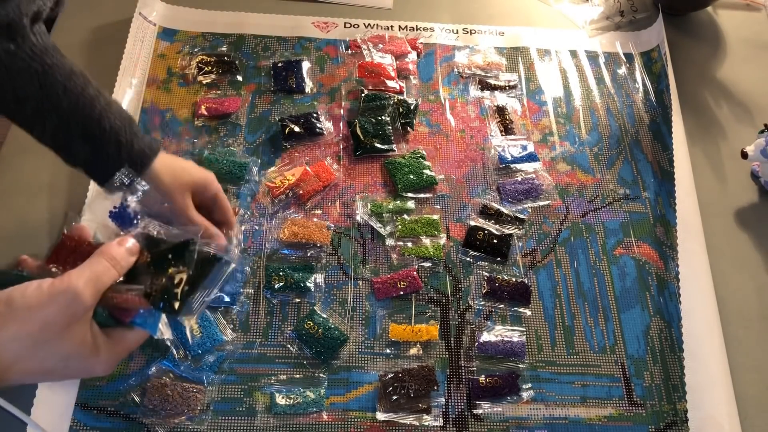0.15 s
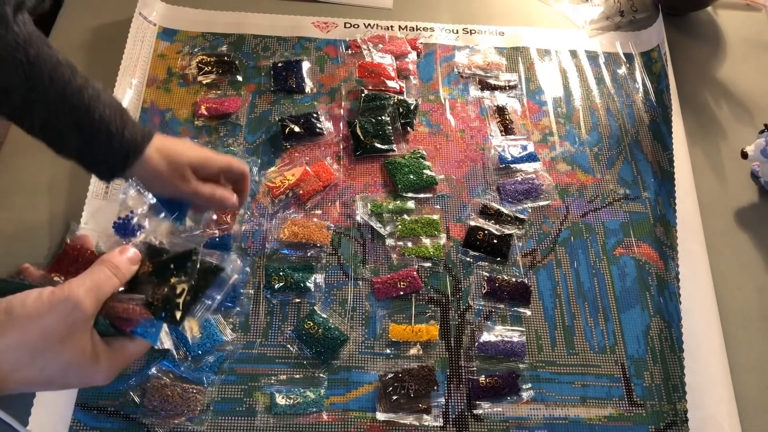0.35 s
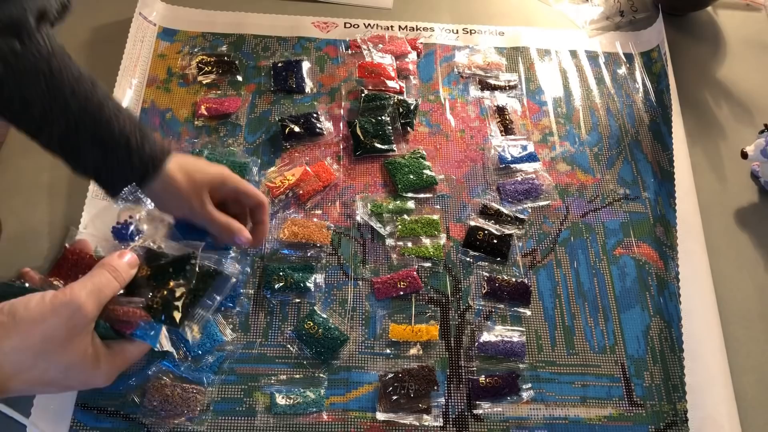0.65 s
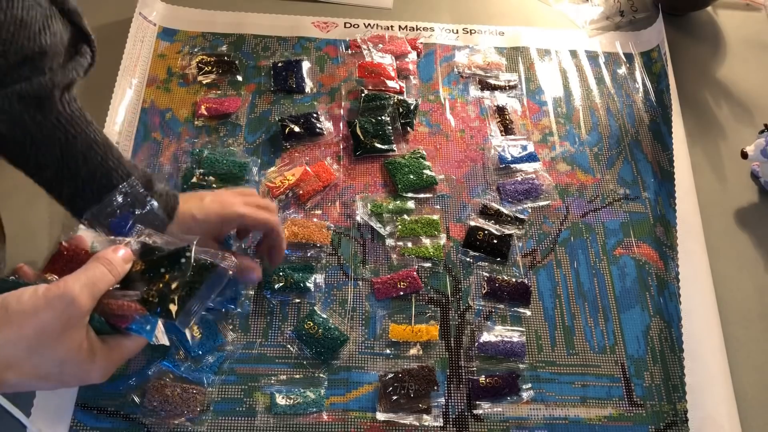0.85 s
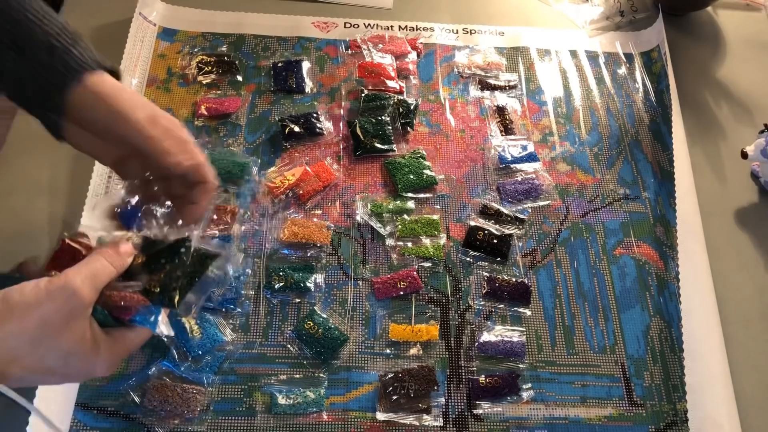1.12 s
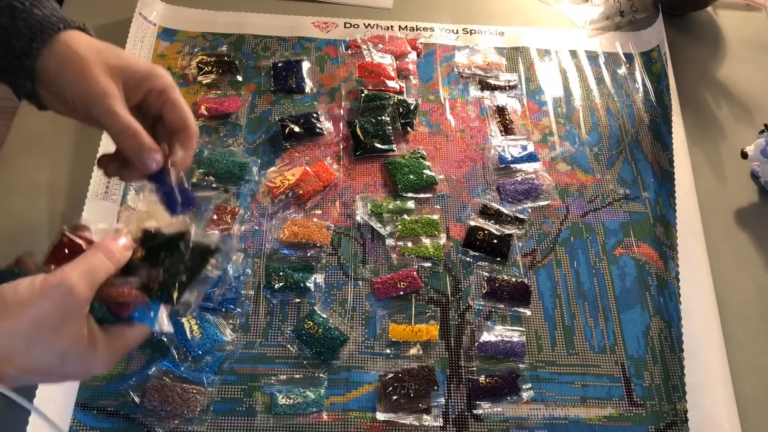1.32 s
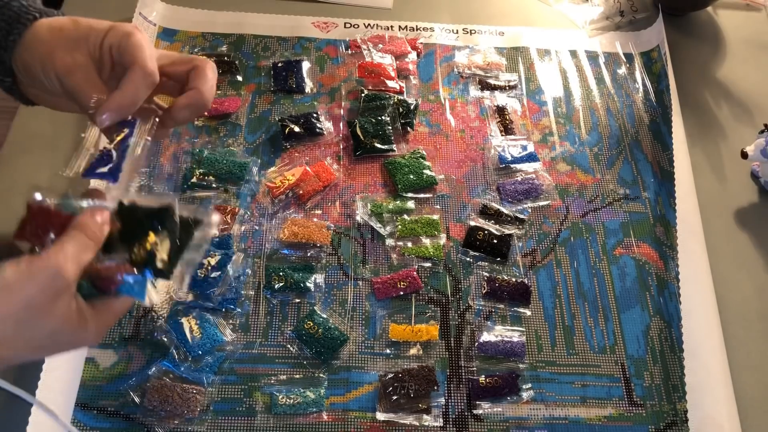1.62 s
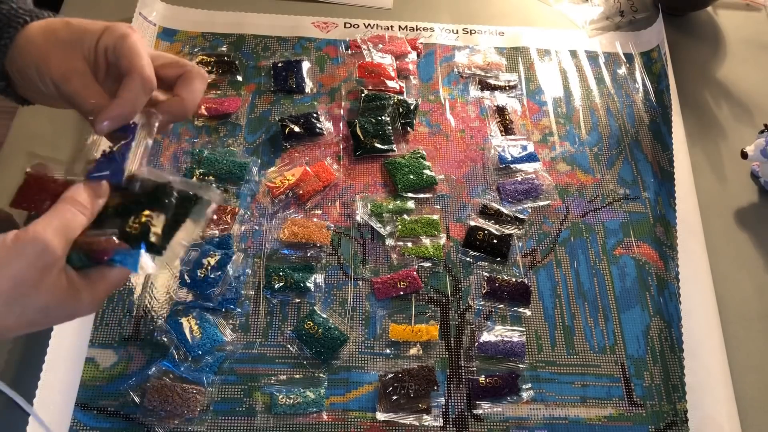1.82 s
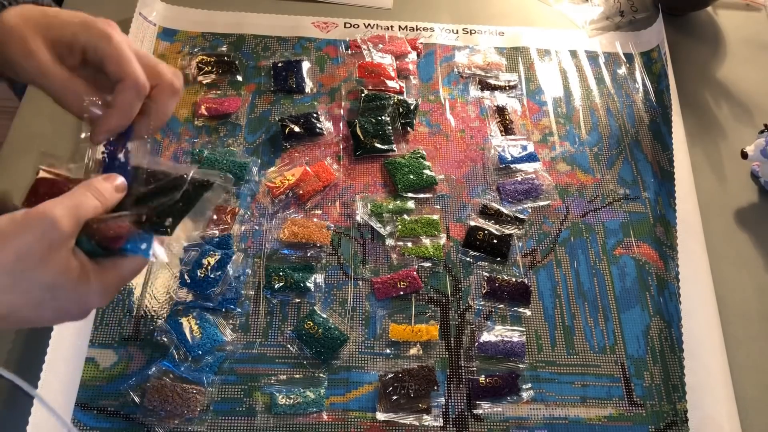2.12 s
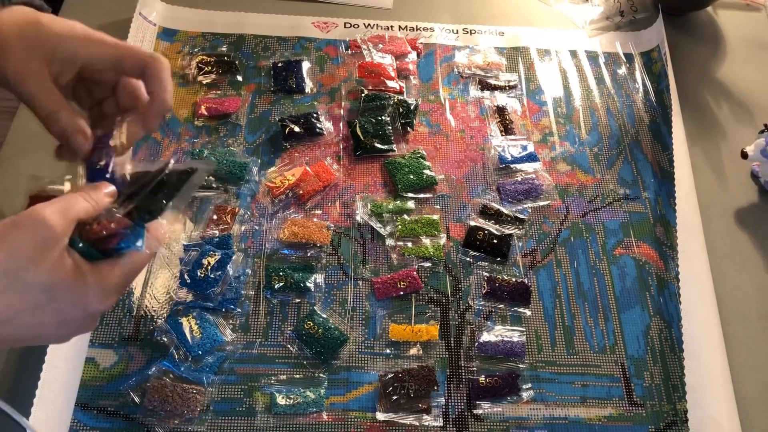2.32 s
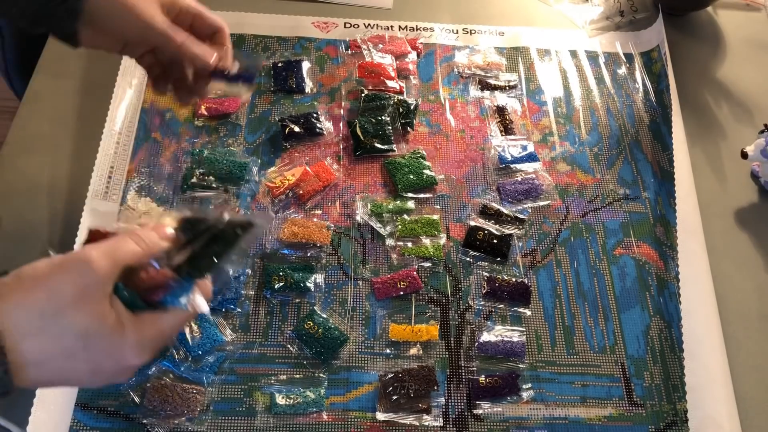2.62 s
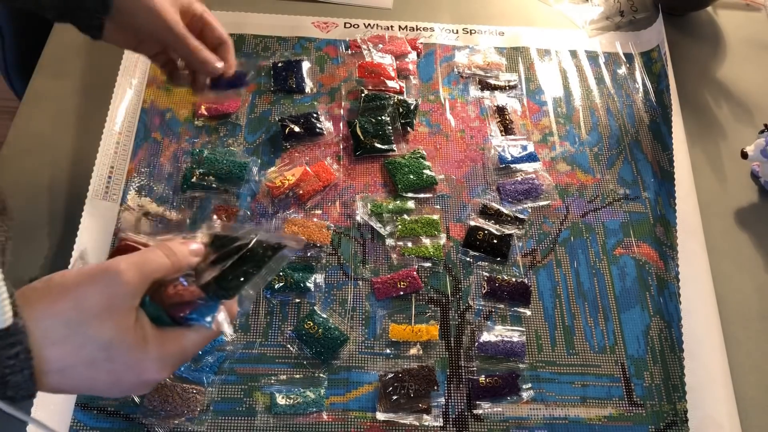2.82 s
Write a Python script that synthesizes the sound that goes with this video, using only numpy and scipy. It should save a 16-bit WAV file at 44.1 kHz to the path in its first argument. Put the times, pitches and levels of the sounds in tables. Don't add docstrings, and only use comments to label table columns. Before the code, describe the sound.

Small plastic bags crinkle and snap in quick clusters as hands sort them on a table

```python
import sys
import numpy as np
from scipy import signal
from scipy.fft import rfft, irfft
from scipy.io import wavfile
from scipy.ndimage import uniform_filter1d

SR = 44100
rng = np.random.default_rng(int(sys.argv[2]) if len(sys.argv) > 2 else 0)


def elevation(decibels):
    levels = np.asarray(decibels, float)
    return 10 ** (levels / 20)


def dump_mix(stems):
    frames = np.atleast_2d(stems).T
    limited = np.clip(frames, -1, 1)
    pcm = np.round(limited * 32767).astype(np.int16)
    wavfile.write(sys.argv[1], SR, pcm)


N = 130095


def evened(x):
    return x / np.sqrt(np.mean(x ** 2) + 1e-20)


def add(mix, s, sound):
    part = mix[round(s * SR):][:len(sound)]
    part += sound[:len(part)]


def colour(x, points):
    f, db = np.transpose(points)
    hz = abs(np.fft.fftfreq(16384, 1 / SR))
    curve_db = np.interp(np.log(hz + 1), np.log(f + 1), db)
    log_gain = np.log(elevation(np.maximum(curve_db, -100)))
    taps = np.fft.ifft(np.exp(np.conj(signal.hilbert(log_gain)))).real[:8192]
    return signal.oaconvolve(x, taps)[:len(x)]


def crease(x, hz, q):
    r = np.exp(-np.pi * hz / q / SR)
    poles = [1, -2 * r * np.cos(2 * np.pi * hz / SR), r * r]
    return (1 - r * r) / 2 * signal.lfilter([1, 0, -1], poles, x)


def hush():
    # f/Hz, level/dB
    hush_curve = [(53, -15), (90, -18.5), (292, -12.5), (640, -19), (1010, -16.5), (1210, -25.5),
                  (8390, -32.5), (16500, -33)]
    # t/s, level/dB
    drift = [(0, 6), (.3, 0.9), (2.55, 2), (2.7, -4.5)]
    level_db = -71.5 + np.interp(np.arange(N) / SR, *np.transpose(drift))
    noise = rng.standard_normal(N + 9000)
    return elevation(level_db) * evened(colour(noise, [(40, -36)] + hush_curve)[9000:])


def handling():
    # f/Hz, level/dB
    shake_curve = [(1.2, -32), (2.0, 14.5), (19, -3), (30, -19.5), (38, -12.5), (160, -36.5), (210, -79),
                   (350, -120)]
    f, db = np.transpose(shake_curve + [(400, -98)])
    hz = np.fft.rfftfreq(N, 1 / SR)
    gain = elevation(np.interp(np.log(hz + 1), np.log(f + 1), db))
    shake = evened(irfft(rfft(rng.standard_normal(N)) * gain, N))
    t = np.arange(N) / SR
    return elevation(-49) * shake * np.sin(np.pi * t / t[-1]) ** .2


def room(x):
    t60_s = 0.24
    taps = np.zeros(20000)
    at = np.arange(120, 19960, 20)
    taps[at + rng.integers(0, 20, len(at))] = rng.choice([-1., 1.], len(at))
    taps = taps * elevation(-60 * np.arange(20000) / SR / t60_s)
    taps = colour(taps, [(300, 4.0), (6000, 4.5), (16000, -9.5)])
    return signal.oaconvolve(x, taps / np.linalg.norm(taps))[:N]


def stand_bumps():
    # t/s, peak level/dB, f/Hz
    bump_rows = [
        (0.885, -46, 51),
        (2.076, -42, 30.4),
        (2.186, -36, 26),
        (2.214, -43.5, 60),
        (2.246, -39, 127),
        (2.29, -45, 47.3),
        (2.324, -43, 41.6),
    ]
    out, t = np.zeros(N), np.arange(8000) / SR
    for s, db, hz in bump_rows:
        u = t * hz / 1.18
        swell = 3 * u * np.exp(-u * u * 2)
        add(out, s - .008, elevation(db) * swell * np.sin(2 * np.pi * hz * t))
    return out


def table_knocks():
    # t/s, peak level/dB, f/Hz
    knocks = [(0.349, -51.5, 735), (0.364, -48, 770), (0.384, -43, 700), (0.512, -44.5, 955),
              (1.319, -51, 536), (1.385, -39, 380), (1.399, -42, 960), (1.407, -42.5, 513),
              (1.416, -44.5, 372), (1.531, -54.5, 382), (1.605, -45, 360), (1.852, -40, 858),
              (2.246, -38.5, 822), (2.366, -43.5, 364), (2.389, -47.5, 400), (2.4525, -42, 605),
              (2.513, -33, 1154), (2.514, -36, 364),
              (0.355, -46.5, 754), (0.371, -43.5, 756), (0.408, -51.5, 627), (0.887, -51, 767),
            (1.535, -57, 363), (1.589, -52, 358), (1.866, -43.5, 886), (1.897, -47, 1060),
            (1.956, -52.5, 760), (2.067, -51, 780), (2.091, -52, 514), (2.115, -61.5, 344),
            (2.157, -54, 385), (2.196, -48.5, 344), (2.475, -41.5, 517), (2.525, -35.5, 950)]
    ring_cycles, thud_share, attack_s = 16, .35, 0.00042
    out, t = np.zeros(N), np.arange(8000) / SR
    for s, db, hz in knocks:
        noise = rng.standard_normal(len(t))
        thud = evened(crease(crease(noise, 0.82 * hz, 1.65), 0.82 * hz, 1.65))
        pair = np.sin(2 * np.pi * hz * t) + thud_share * thud
        fall = elevation(db - 60 * t * hz / ring_cycles)
        add(out, s, fall * (1 - np.exp(-t / attack_s)) * pair)
    return out


def crackle():
    # f/Hz, level/dB
    rustle = [(180, -42.5), (300, -5.5), (756, -9.5), (1640, -6.5), (2400, -3.5), (2980, -5), (8140, -1),
              (15500, -3.5)]
    grains_per_s, grain_cycles, spread_db, hiss_db, patchy_db = 6000, 5.0, 3.4, -3, 2.8
    size = elevation(spread_db * np.minimum(rng.exponential(1, N), 3.8))
    size *= rng.random(N) < grains_per_s / SR
    size *= rng.choice([-1., 1.], N)
    kind, out = rng.integers(0, 24, N), np.zeros(N)
    for k, hz in enumerate(np.linspace(600, 16000, num=24)):
        u = np.arange(200) * hz / SR
        grain = np.sin(2 * np.pi * u + 1.1) * np.exp(-3 * u / grain_cycles)
        out += signal.oaconvolve(size * (kind == k), grain / np.linalg.norm(grain))[:N]
    film = evened(out) + elevation(hiss_db) * rng.standard_normal(N)
    z = signal.stft(film, nperseg=256)[2]
    patches = uniform_filter1d(rng.standard_normal(z.T.shape), size=8, axis=0)
    patches = evened(uniform_filter1d(patches, size=9, axis=1))
    film = signal.istft(z * elevation(patchy_db * patches.T), nperseg=256)[1][:N]
    return evened(colour(film, rustle))


def snap(db, hz, ring_db):
    snap_s, rebound_db, tick_db = .0005, -12, 8.5
    chance = rng.standard_normal(600)
    t = np.arange(len(chance)) / SR
    later = t - .001 - 0.0011 * abs(np.tanh(chance[0]))
    rebound = elevation(rebound_db) * (later > 0) * np.exp(-abs(later) / snap_s)
    push = chance * (np.exp(-t / snap_s) + rebound)
    push[8] += elevation(tick_db)
    x = evened(push) + elevation(ring_db) * evened(crease(push, hz, 4.5))
    x = signal.lfilter(*signal.butter(2, min(0.204 * hz, 9000), 'high', fs=SR), x)
    return elevation(db) * x / abs(x).max()


def bags():
    # t/s, peak level/dB, crease f/Hz, shower level re peak/dB
    snaps = [(0.0906, -40, 4600, -19), (0.2349, -36.5, 8700, -9), (0.3404, -48, 9910.0, -8.9),
             (0.3845, -33.5, 6130, -14), (0.4181, -40, 5130, -8), (0.4835, -35.5, 6870, -10.5),
             (0.5116, -39.5, 9360, -7), (0.5146, -41, 9520.0, -11.6), (0.756, -44, 8600, -16),
             (0.8306, -29.5, 9800, -27), (0.8823, -44, 2080, -11.3), (0.8902, -39.5, 2250, -9.6),
             (0.9228, -38.5, 2200, -9), (1.0168, -49, 5040, -10), (1.243, -44, 5200, -10),
             (1.249, -31, 5300, -11), (1.2725, -27, 5600.0, -13), (1.2947, -39, 5600, -12),
             (1.3091, -32, 7100, -9.5),
             (1.3608, -40, 3620.0, -16), (1.3872, -33, 9400, -9), (1.4011, -18, 9800, -13.5),
               (1.418, -32, 9130.0, -15), (1.4403, -31.5, 6550.0, -24), (1.4494, -34.5, 2320, -21),
               (1.4753, -39.5, 4870.0, -19), (1.5334, -28.5, 11000, -7.4), (1.59, -32.5, 7750, -11),
               (1.6057, -18, 9700, -22.5), (1.6418, -41, 5430, -17), (1.7155, -44, 9900, -14.6),
               (1.7915, -48, 2200, -15), (1.8204, -42, 7800, -14), (1.833, -41.5, 9700, -11.5),
               (1.8523, -29, 10030.0, -16), (1.8663, -32.5, 8130, -11.5), (1.8992, -22, 8100, -17.5),
               (1.9014, -23, 3600, -25), (1.9288, -31.5, 10680.0, -14.5), (1.9467, -31, 9950.0, -17),
               (1.9524, -31, 7940, -14), (1.9594, -24, 5040, -13), (1.9985, -34.5, 3600, -15),
             (2.069, -36, 7250, -6.5), (2.1075, -36.5, 5040.0, -16), (2.1175, -35.5, 2150, -11),
               (2.126, -34, 3750.0, -25), (2.1514, -33, 7920.0, -7.1), (2.162, -35, 2640, -6),
               (2.1953, -27, 5130, -16.5), (2.1987, -37, 7250, -26), (2.2132, -27, 7540, -15.5),
               (2.2458, -27, 9900, -14), (2.2491, -12, 9600, -21), (2.3325, -32.5, 2200, -13),
               (2.3794, -33, 9350.0, -15), (2.3906, -24.5, 5700, -17), (2.4533, -18.5, 4760, -18),
               (2.4584, -20, 10380.0, -17), (2.5138, -24, 2370.0, -12), (2.7007, -29, 3300, -22),
               (2.743, -32, 8250, -15.5), (2.759, -31, 9200, -12), (2.787, -35, 9260, -26),
               (2.7998, -35, 8900, -36), (2.8156, -25, 9100, -25), (2.8407, -35, 9600, -25),
               (2.8961, -30, 11900, -41)]
    # t/s, peak level/dB, crease f/Hz
    ticks = [(0.2842, -41, 7000), (0.3495, -44, 2100), (0.3776, -36, 8800), (0.4303, -44, 4000),
             (0.4623, -45, 7400), (0.4868, -40, 6900), (0.56, -50, 8600), (0.6548, -49, 6900),
             (0.6579, -49, 7000), (0.8072, -40, 1900), (0.8332, -37, 10300), (1.2466, -40, 5300),
             (1.2517, -37, 5200), (1.2689, -37, 5300), (1.3123, -38, 8000), (1.3235, -36, 7700),
             (1.3744, -41, 3800), (1.4035, -23, 11200), (1.5102, -40, 6800), (1.5188, -39, 8200),
             (1.5224, -42, 10500), (1.6095, -28, 7800), (1.6902, -47, 9000), (1.7936, -47, 2200),
             (1.8235, -50, 2200), (1.8556, -38, 8400), (1.8696, -38, 10100), (2.0221, -44, 2100),
             (2.039, -43, 7600), (2.0767, -41, 11800), (2.0841, -38, 3700), (2.0915, -37, 10200),
             (2.1288, -41, 7800), (2.1399, -43, 8700), (2.1562, -32, 4500), (2.1677, -34, 3700),
             (2.2167, -40, 9100), (2.2905, -39, 8800), (2.3019, -43, 2200), (2.3282, -42, 6600),
             (2.336, -36, 3100), (2.4391, -43, 9200), (2.4459, -38, 9100), (2.4658, -30, 4700),
             (2.5657, -38, 5600), (2.6061, -38, 10200), (2.6125, -40, 11600), (2.6212, -45, 5600),
             (2.6536, -48, 7200), (2.6827, -52, 9600), (2.7096, -44, 9600), (2.7469, -40, 5400),
             (2.7629, -36, 8700), (2.8061, -40, 3500), (2.819, -38, 8800), (2.8648, -39, 5500),
             (2.8723, -45, 5500), (2.8856, -44, 9000), (2.9021, -42, 10600), (2.9431, -48, 10100)]
    # middle t/s, half length/s, level/dB
    squeezes = [(.01, 0.02, -67), (0.277, 0.038, -58), (0.376, 0.02, -51), (0.453, 0.041, -59),
                (0.536, 0.022, -61), (0.617, 0.033, -63.5), (0.708, 0.017, -63), (0.825, 0.022, -53.5),
                (0.922, 0.051, -61.5), (1.398, 0.097, -58.5), (1.545, 0.012, -48), (1.605, 0.047, -59),
                (1.895, 0.037, -54), (1.964, 0.011, -42), (2.091, 0.018, -52.5), (2.182, 0.039, -52),
                (2.25, 0.0044, -31.5), (2.377, 0.025, -49), (2.477, 0.017, -42.5), (2.529, 0.013, -41.5),
                (2.578, 0.034, -54), (2.856, 0.047, -57), (2.74, 0.038, -62.5), (2.68, 0.012, -66)]
    rise_s, shower_s, slow_s, slow_db = 0.00094, 0.0078, 0.077, -22
    lead_s, tint_db = .0012, -10
    t = np.arange(N) / SR
    cracks, power, grains = np.zeros(N), np.zeros(N), crackle()
    u = t[:12000]
    fall = np.exp(-u / shower_s) + elevation(slow_db) * np.exp(-u / slow_s)
    fall = (1 - np.exp(-u / rise_s)) * fall

    def place(s, crack):
        add(cracks, s - np.argmax(abs(crack)) / SR, crack)

    for k, (s, db, hz, shower_db) in enumerate(snaps):
        place(s, snap(db, hz, 1.5))
        shower = elevation(db + min(shower_db, -10)) * fall
        tint = evened(crease(grains[1500 * k:][:len(u)], hz, 4.4))
        add(cracks, s - lead_s, elevation(tint_db) * shower * tint)
        add(power, s - lead_s, shower ** 2)
    for s, db, hz in ticks:
        place(s, snap(db, hz, 5))
    for s, half, db in squeezes:
        power += elevation(2 * db) * np.exp(-((t - s) / half) ** 2)
    return cracks + np.sqrt(power) * grains


def scene():
    near = bags() + table_knocks() + stand_bumps()
    return (near + elevation(-14) * room(near) + hush() + handling())[None]


def low_pass(x):
    return signal.sosfilt(signal.butter(12, 16600, fs=SR, output="sos"), x)


def record(dry):
    # f/Hz, level/dB
    mic = [(7000, 0.68), (9400, 2), (11500, 0.16), (15700, -10.5), (16300, -35)]
    return low_pass(colour(dry[0], mic)[None])


dry = scene()
out = record(dry)
dump_mix(out)
```